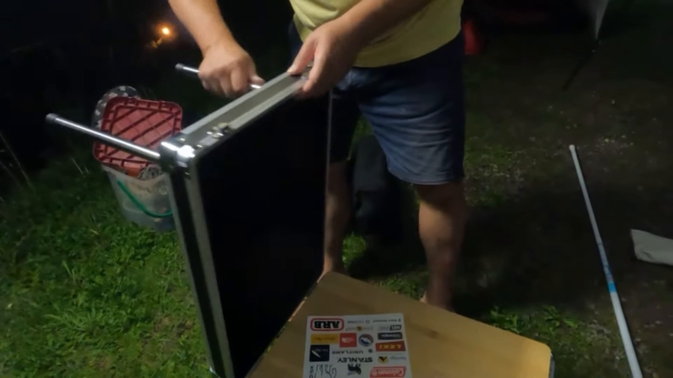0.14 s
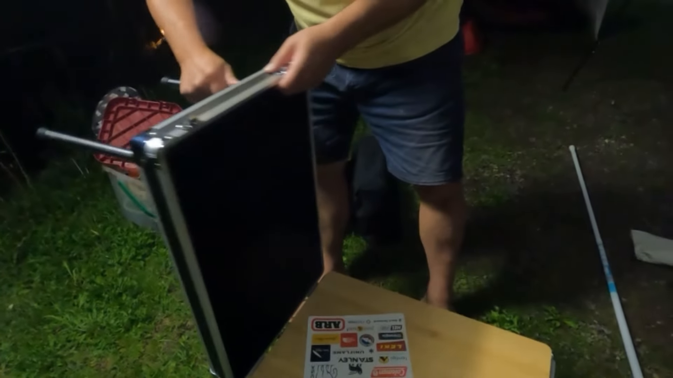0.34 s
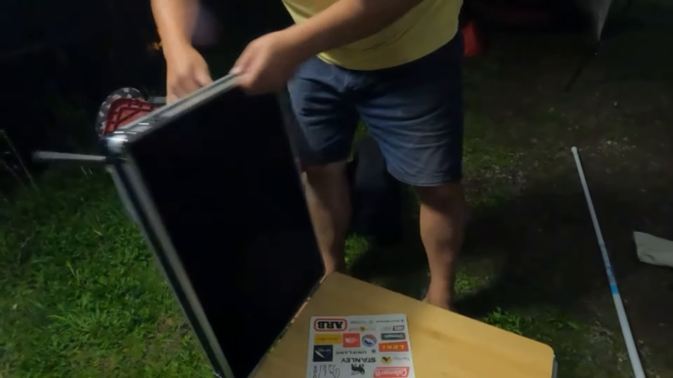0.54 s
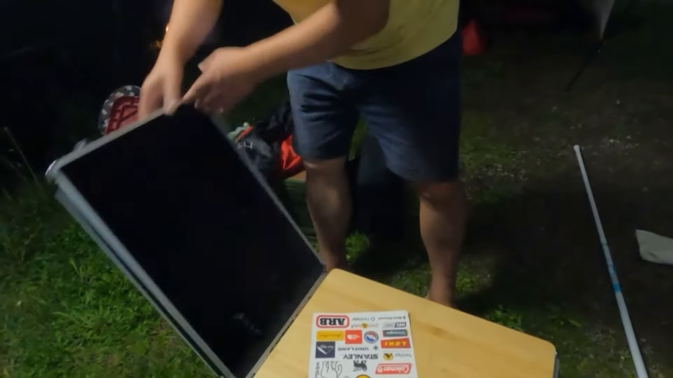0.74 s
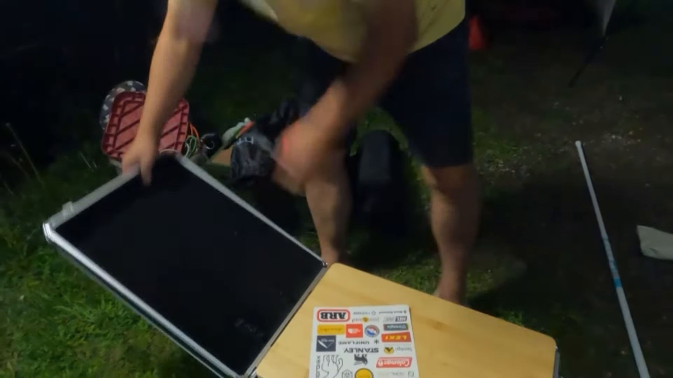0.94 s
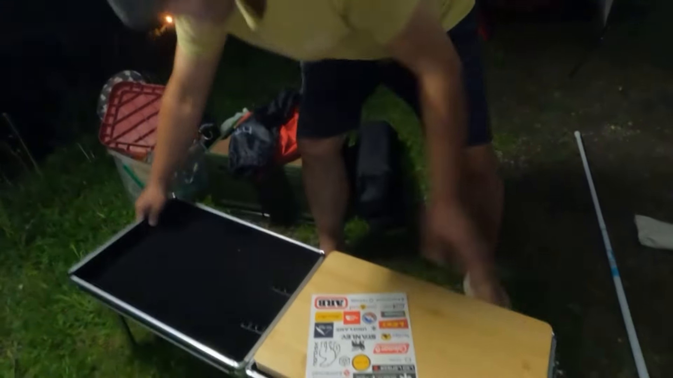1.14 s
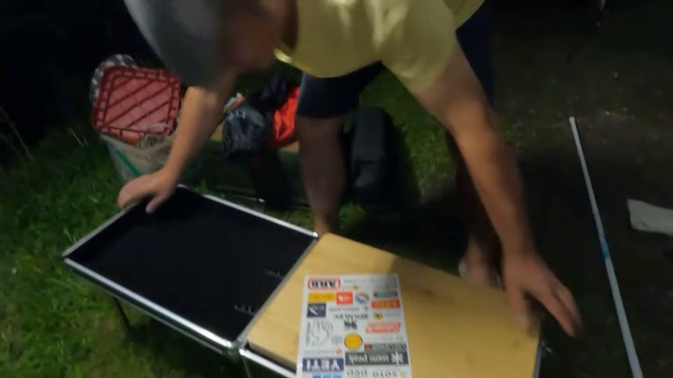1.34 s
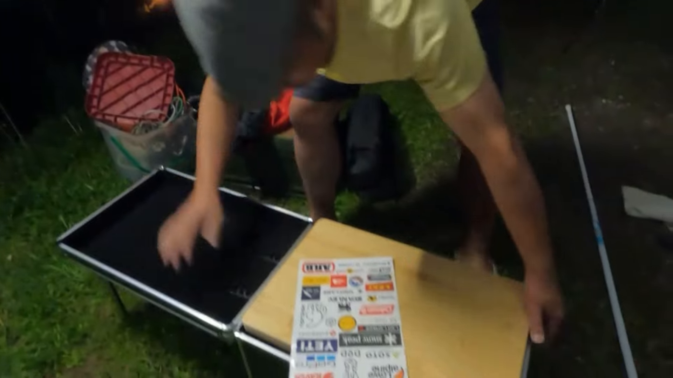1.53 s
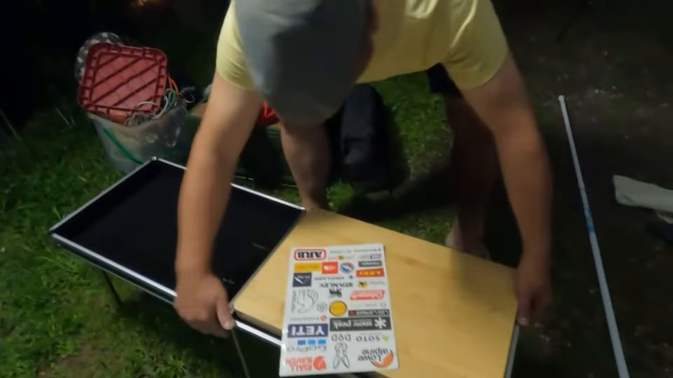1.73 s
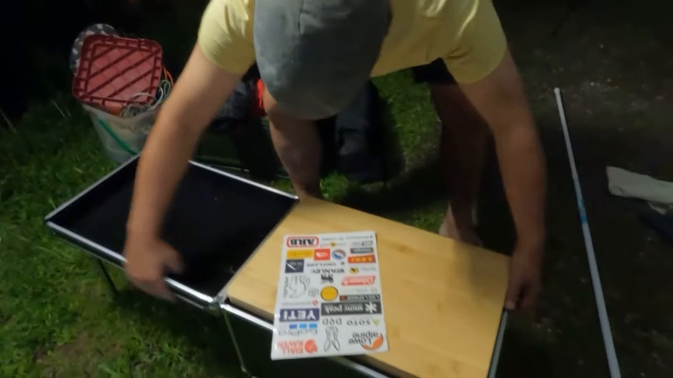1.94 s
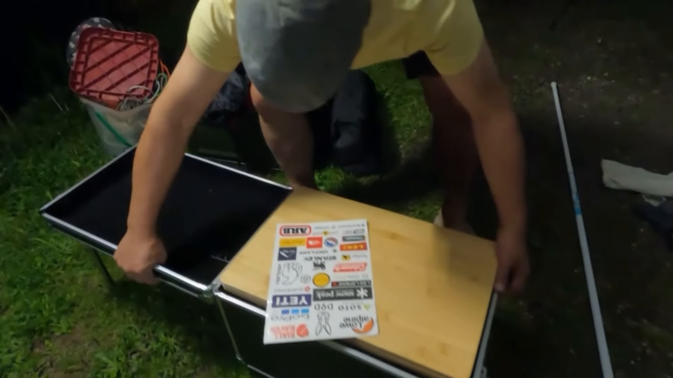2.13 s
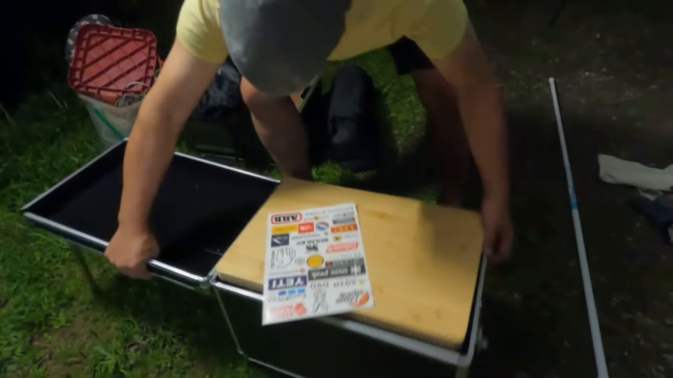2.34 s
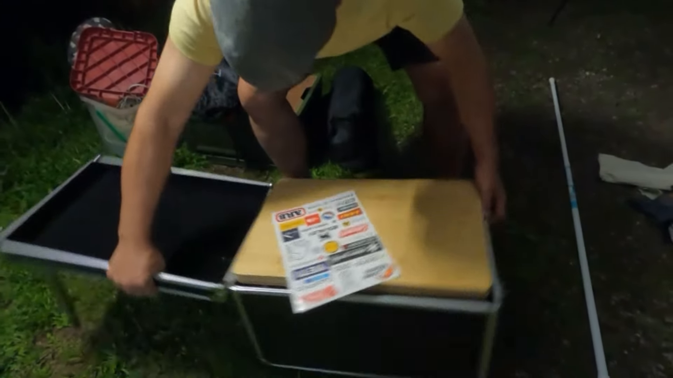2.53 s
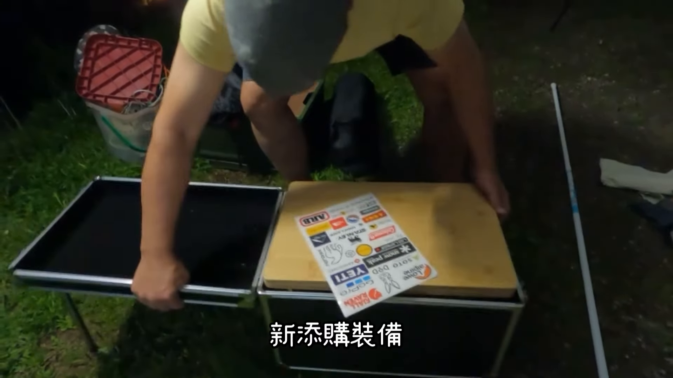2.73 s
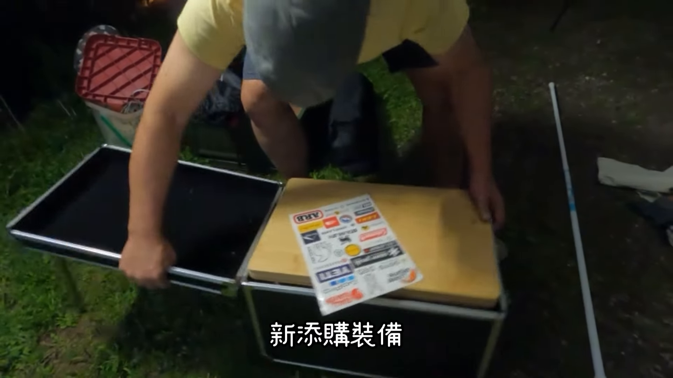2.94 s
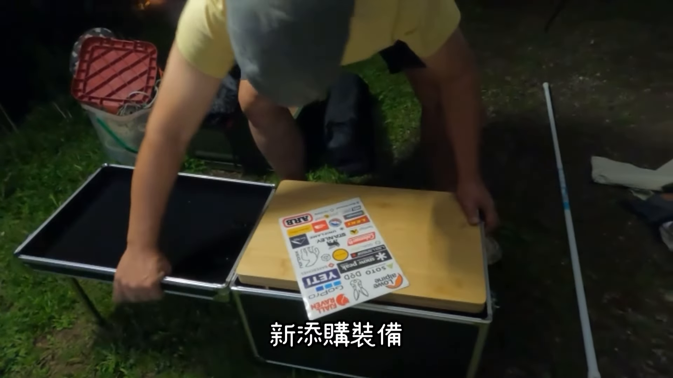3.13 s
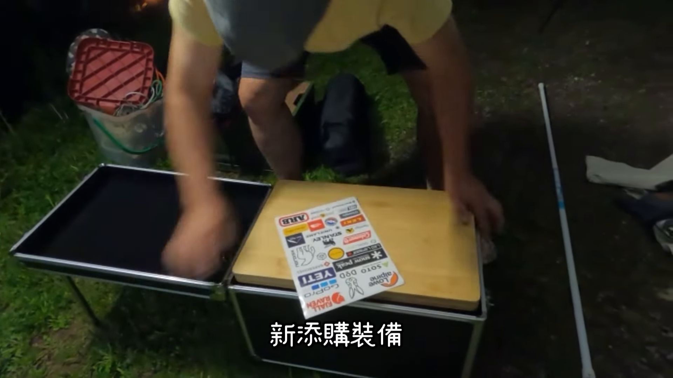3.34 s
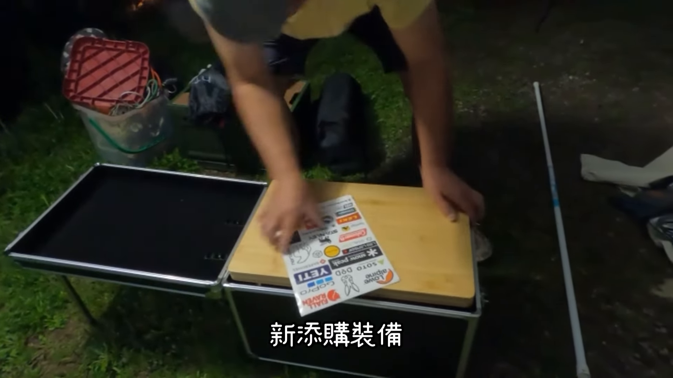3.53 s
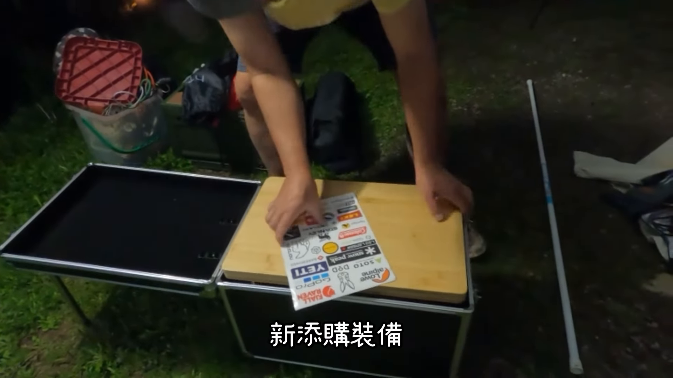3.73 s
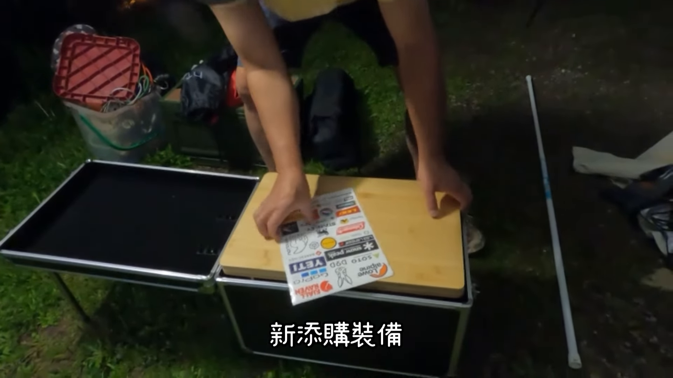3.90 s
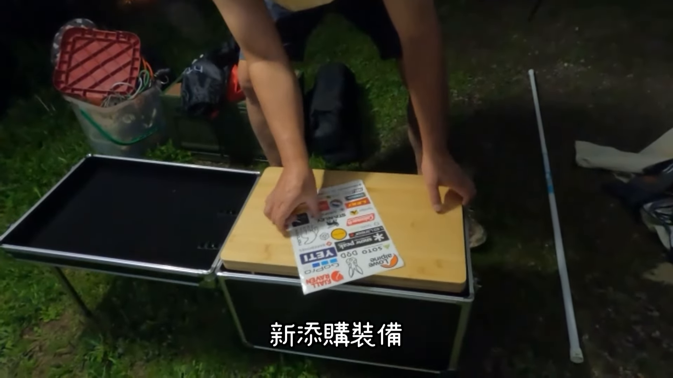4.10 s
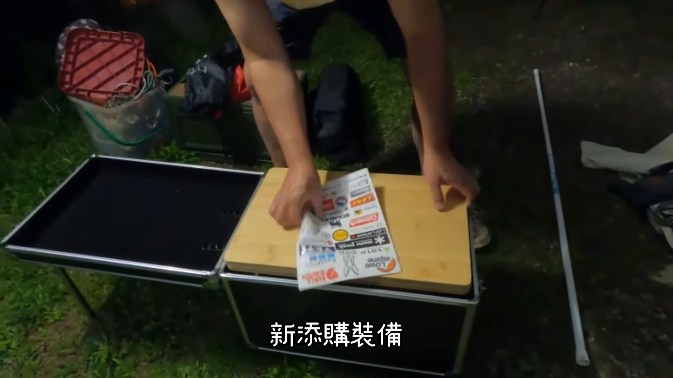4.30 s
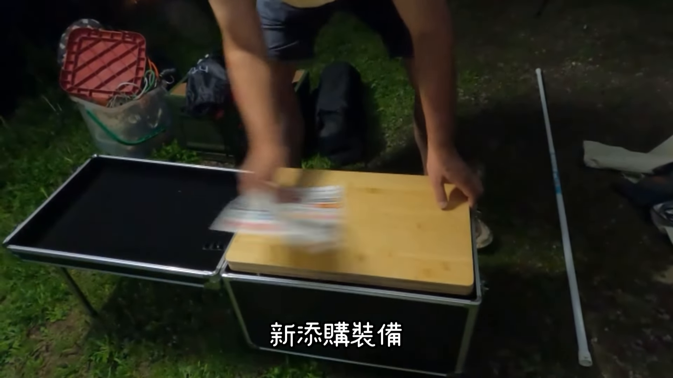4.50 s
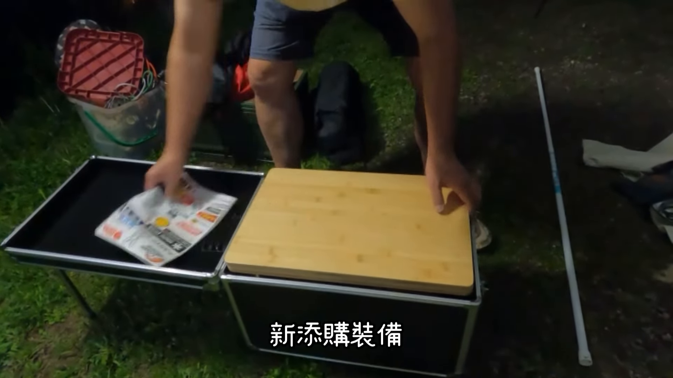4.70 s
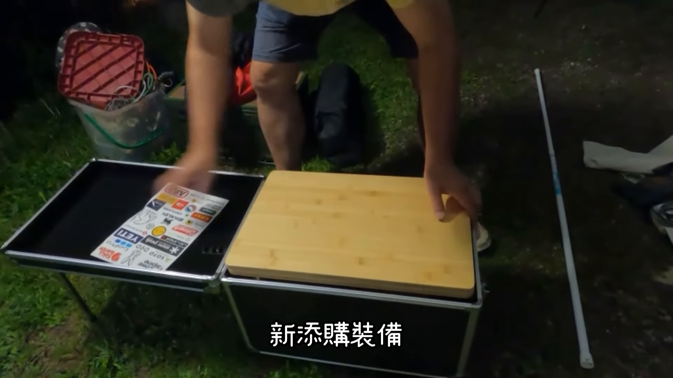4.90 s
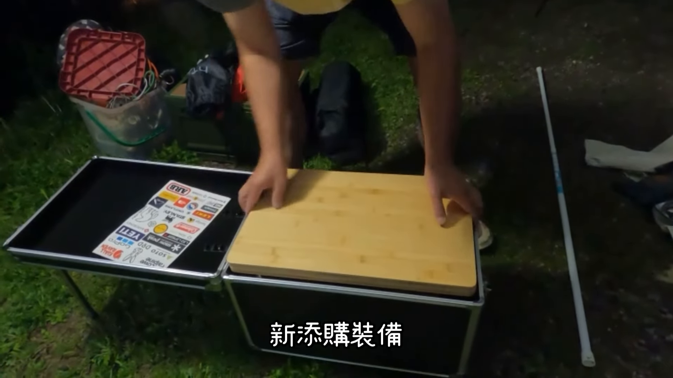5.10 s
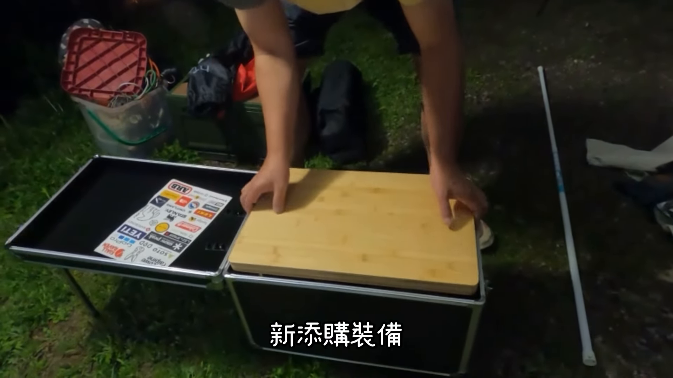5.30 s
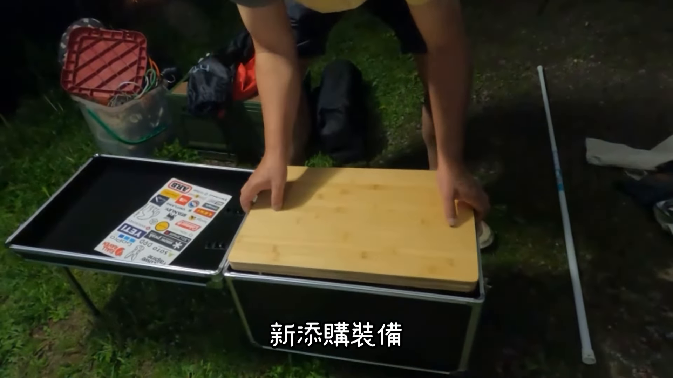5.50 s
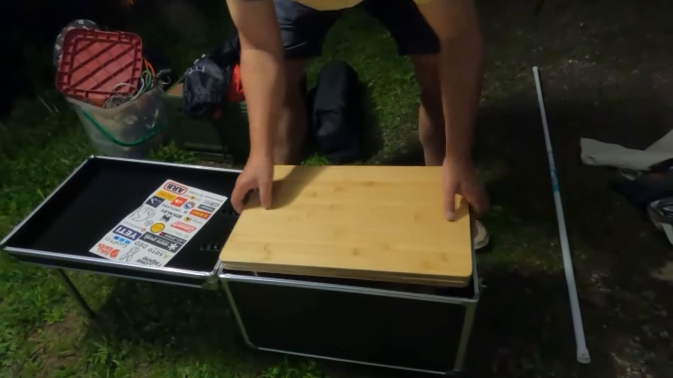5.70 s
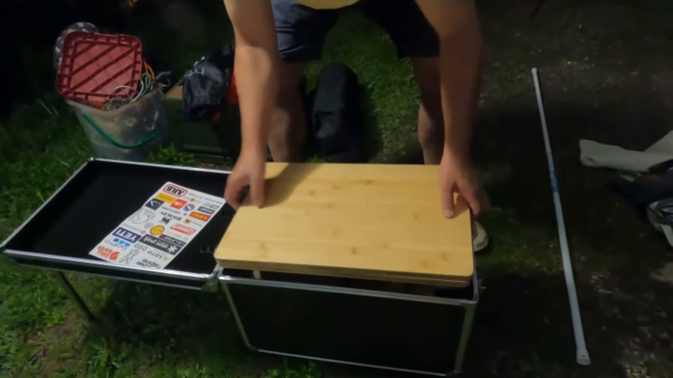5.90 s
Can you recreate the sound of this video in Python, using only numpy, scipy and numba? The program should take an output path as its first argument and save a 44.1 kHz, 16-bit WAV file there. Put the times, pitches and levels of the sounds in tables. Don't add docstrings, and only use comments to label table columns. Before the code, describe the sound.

At night outdoors, a folding metal-framed table clacks open with knocks and thuds, then a thin sheet swishes aside, over faint insects.

```python
import sys
import numpy as np
from scipy import signal
from scipy.fft import rfft, irfft, next_fast_len
from scipy.io import wavfile
from numba import njit

SR = 44100
rng = np.random.default_rng(int(sys.argv[2]) if len(sys.argv) > 2 else 0)


def unload_wav(signal):
    wavfile.write(
        sys.argv[1],
        SR,
        np.round(np.clip(np.atleast_2d(signal).T, -1, 1) * 32767).astype(np.int16),
    )


def attenuation_scalar(level_db):
    decades = np.asarray(level_db, float) / 20
    return 10 ** decades


N = 262395

# (time [s], peak level [dB], brightness [dB], tail T60 [s])
LEG_RINGS = [
    (0.679, -37.5, -4.5, 0.15),
    (0.822, -46, -11, 0.045),
    (2.694, -18, -25, 0.18),
    (2.858, -32.5, -22.5, 0.33),
    (3.085, -27.5, -31, 0.15),
    (3.112, -13.5, -10.5, 0.13),
]
JOINT_KNOCKS = [(1.235, -10.5, -15.5, .069), (1.242, -9.5, -9, .12), (1.25, -16, -24, 0.11),
                (1.93, -33.5, -26, 0.21), (2.338, -39, -13, 0.34), (2.469, -26, -24, 0.14),
                (2.598, -24, -20.5, 0.65), (2.682, -12.5, -8.5, 0.12), (2.728, -18, -16.5, 0.27),
                (2.965, -17, -19, .3), (2.999, -22, -9.5, 0.12), (3.117, -9.5, -20.5, 0.17),
                (3.126, -13, -16.5, 0.16), (3.197, -25.5, -10, 0.11), (1.592, -31, -15.5, .12),
                (5.104, -27.5, -13, 0.2), (5.569, -52, -13, 0.24), (5.893, -17, -13.5, .11)]
RIM_SNAPS = [(0.119, -36.5, -9.5, 0.088), (1.607, -32, -15, 0.15), (1.99, -31.5, -11.5, 0.35),
             (2.044, -33, -22, 0.22), (1.222, -27, -29, .25), (4.398, -32.5, -24.5, 0.14),
             (1.677, -31, -27, 0.19), (1.842, -17, -17, 0.094), (2.292, -42, -20, 0.13),
             (2.4, -43, -13, 0.28), (2.77, -16.5, -8, 0.085), (3.133, -13, -3.5, 0.063),
             (3.187, -14, -21.5, 0.081), (3.33, -31, -11, .27), (3.348, -27, -14, 0.54),
             (3.885, -43.5, -27.5, 0.22), (4.413, -16, -11.5, 0.067), (4.713, -25.5, -37, 0.061),
             (4.724, -22.5, -17, 0.029), (4.733, -14, -21, 0.1), (4.817, -28.5, -18.5, 0.29),
             (5.284, -32, -14.5, 0.18)]
TUBE_TAPS = [
    (1.088, -40.5, -43.5, 0.53),
    (1.748, -52, 6.5, 0.25),
    (2.246, -41, -32, .13),
    (2.529, -41, -12, 0.11),
    (4.306, -43, -15, 0.13),
    (4.798, -37.5, -3.5, 0.11),
    (4.898, -38, -14, 0.089),
    (5.707, -47.5, -13, .072),
]
TICKS = [
    (1.667, -45, -7, .098),
    (3.38, -28, -17, 0.15),
    (3.403, -28, -2.5, 0.08),
    (3.988, -44, 4, 0.2),
    (4.038, -45.5, -9, .075),
    (4.089, -34, -3.5, 0.15),
    (4.624, -37, -14.5, 0.13),
    (4.826, -39, 0.5, 0.11),
    (5.361, -57, 2, .079),
    (5.385, -23.5, -6, .14),
]
LATCH_CLICKS = [
    (1.618, -10, -17.5, 0.18),
    (1.627, -16.5, -16, 0.13),
    (1.643, -29, -22, 0.081),
    (2.076, -14, -18.5, 0.15),
]
FREE_RINGS = [
    (2.743, -20, -32, 0.13),
    (2.886, -21, -36, 0.17),
    (2.937, -28, -52, 0.39),
]
# (frequency [Hz], share [dB], overtone [dB])
LEG = (1040, 13, -33.5)
JOINT = (992, -2.5, -16)
RIM = (1240, -12, 0)
TUBE = (2200, 2.6, -13)
PIN = (3680, 22, -31)
LATCH = (1230, 0.72, -1.44)
FREE_LEG = (860, 37, -38)
# (frequency [Hz], level [dB], T60 [s])
FRAME_MODES = [(1265, 0, 0.11), (1647, -1, 0.093), (2030, -10, 0.16), (2902, -8, 0.13), (3079, -1, 0.09),
               (3558, -6, 0.14), (4823, -12, 0.11), (5992, -22, 0.21), (6681, -15, 0.17)]
# (frequency [Hz], level [dB per Hz])
CLACK_BODY = [(240, -8), (400, -5.5), (641, -7), (706, -2), (770, -7), (1050, -5), (1170, -5), (1780, -3),
              (5200, -12), (6760, -60.5), (11400, -120)]
CLACK_TOP = [(2820, -82), (4800, -8), (5070, -6.5), (6440, -5), (7730, -12.5), (8650, -20.5), (10600, -17),
             (12100, -20.5), (13800, -33.5), (15500, -53.5)]
# (time [s], peak level [dB], frequency [Hz], T60 [s])
CLEAR_RINGS = [(1.2215, -26, 1564, .05), (1.222, -28.5, 977, .12), (1.243, -18.5, 1023, 0.057),
               (1.243, -21.5, 2500, 0.037), (1.592, -38, 1160, .04), (1.608, -37, 3720, .05),
               (1.618, -17, 1269, 0.1), (1.619, -13, 3610, .05), (1.619, -21, 2944, 0.053),
               (1.627, -23.5, 3310, 0.062), (1.629, -25.5, 1500, 0.062), (1.644, -29.5, 2890, .06),
               (1.668, -39, 3500, .06), (1.678, -37, 1250, 0.096), (2.0765, -17, 1230, .11),
               (2.077, -23.5, 2846, 0.064), (2.077, -23, 3550, 0.051), (2.086, -27, 2004, 0.067),
               (2.09, -29.5, 2905, 0.056), (2.121, -42, 720, 0.075), (2.684, -20, 1043, 0.062),
               (2.7, -26, 1000, 0.065), (2.73, -22.5, 560, .05), (2.739, -22.5, 1105, 0.037),
               (2.753, -24.5, 1000, 0.083), (2.771, -26.5, 2210, 0.035), (2.859, -34.5, 960, .05),
               (2.8855, -15.5, 921, 0.036), (2.894, -24, 515, .04), (2.939, -32, 906, .07),
               (2.94, -35, 1540, .05), (2.966, -26.5, 907, 0.07), (3.059, -31.5, 900, .06),
               (3.087, -30, 946, .05), (3.111, -20.5, 2316, .04), (3.135, -20.5, 1490, 0.044),
               (3.147, -27.5, 1400, 0.046), (2.618, -32, 620, .12), (5.106, -32, 780, .1),
               (4.399, -27, 1500, .04), (4.414, -26.5, 4880, 0.035), (4.416, -24, 1213, .25),
               (4.624, -33, 4500, .03), (4.713, -34.5, 1700, 0.046), (4.733, -18.5, 2800, 0.029),
               (4.733, -21.5, 1410, 0.067), (4.75, -33.5, 776, 0.097), (2.64, -30, 520, .12),
               (4.818, -38, 1500, 0.036)]

# (time [s], peak level [dB], lowest panel mode [Hz], T60 [s])
PANEL_KNOCKS = [(2.137, -45.5, 210, .14), (1.622, -28.5, 286, 0.19), (1.758, -44.5, 143, 0.23),
                (1.841, -43, 192, 0.2), (2.402, -42, 98, 0.13), (2.73, -16.5, 154, 0.23),
                (2.774, -30, 119, 0.065), (2.853, -32, 102, 0.089), (2.889, -21, 168, 0.077),
                (2.998, -21.5, 177.7, 0.2), (3.11, -8, 249.3, 0.055), (4.729, -39.5, 233.5, 0.22),
                (4.817, -33.5, 191, 0.092), (5.102, -22, 157.4, .22), (5.386, -35, 157.2, .21),
                (5.567, -47, 180.3, 0.23), (5.892, -24, 321, 0.054), (5.919, -25.5, 188, 0.04)]
JOLTS = [(0.326, -49, 134.8, 0.45), (0.497, -76, 210, 0.099), (0.68, -24.5, 175, .16),
         (1.083, -44.5, 235, 0.061), (1.236, -15.5, 201.6, 0.068), (1.249, -15.5, 112, 0.17),
         (2.675, -18.5, 135, .18), (2.746, -15.5, 140.4, 0.056), (2.963, -27.5, 116.5, 0.43),
         (3.058, -35, 282, .09), (3.124, -12, 139, 0.046), (3.142, -23, 155.5, 0.092),
         (3.187, -35, 126.7, 0.23), (3.555, -39, 134, .24), (3.688, -49, 167, 0.11),
         (4.519, -62.5, 158, 0.057), (4.621, -63, 170, .13), (5.284, -39.5, 172, 0.37),
         (5.328, -42, 290, .073), (5.785, -48, 206, .17)]
ROCKING = [
    (0.11, -55.5, 281, 0.24),
    (0.447, -58.5, 110, 0.074),
]
# (multiple of lowest mode [1], level [dB])
PANEL_OVERTONES = [(1.9, -4), (3.1, -4), (4.7, -5.5)]
# (frequency [Hz], level [dB per Hz])
PUFF = [(60, -18.5), (120, 4.5), (330, -0.5), (600, -19.5), (1000, -24)]
# (time [s], peak level [dB], frequency [Hz], T60 [s])
SWAYS = [(0.09, -47, 79.2, 0.58), (0.33, -47, 75, 0.54), (0.8, -47, 80, .4), (1.08, -48, 60, .3),
         (1.228, -22, 170, 0.092), (1.26, -24, 150, .12), (1.27, -36, 45, .25), (1.64, -40, 159, .2),
         (1.76, -46, 72.4, 0.23), (2.08, -43.5, 200, .1), (2.09, -44.5, 140, .25), (2.33, -48, 260, .15),
         (2.405, -40.5, 266, 0.13), (2.777, -16, 129, 0.023), (2.791, -23, 112, 0.14),
         (2.8515, -22, 100, .05), (3.41, -47.5, 75, 0.26), (0.93, -50, 48, .4), (5.108, -27, 298, 0.088),
         (5.29, -44, 84.7, .4), (5.41, -48, 70, .4)]

# (stop time [s], final level [dB], length [s], air gap resonance at start [Hz], at stop [Hz])
SLIDES = [(1.228, -49, 0.1, 1900, 1100), (2.712, -36.5, 0.14, 800, 970), (3.622, -53, 0.18, 2100, 3000),
          (3.656, -45.5, 0.075, 2740, 3500), (1.831, -45.5, 0.05, 930, 1000), (3.1, -54, 0.12, 1100, 1070),
          (3.862, -55, 0.078, 1300, 1380), (4.324, -41, 0.05, 3300, 1900), (4.418, -44, 0.06, 1600, 1200),
          (4.401, -35, .005, 1300, 1300), (0.864, -56, 0.24, 1200, 760), (4.416, -33, 0.008, 1300, 1200),
          (3.999, -46.5, 0.013, 3500, 4600), (4.057, -49.5, 0.059, 3300, 4200),
          (4.534, -41.5, 0.12, 1700, 3000), (4.57, -42, 0.087, 1300, 2900), (4.65, -43, 0.091, 3900, 3500),
          (4.674, -42, 0.027, 2740, 1270), (1.3, -51, 0.125, 1700, 1700), (0.95, -58, 0.067, 1200, 1400),
          (1.2, -63, .06, 1200, 1300), (4.87, -53, .05, 2500, 2500), (5.365, -56, .008, 4500, 4500),
          (5.58, -60.5, .03, 1000, 1300), (5.885, -56, 0.044, 1500, 1500), (0.54, -62, .01, 6500, 6500),
          (0.65, -63, .04, 5000, 6100), (2.66, -44, .05, 600, 900), (3.09, -40.5, 0.014, 2500, 2500),
          (4.37, -47, .05, 1800, 1600)]
# (time [s], frequency [Hz], level [dB])
SQUEAL = [
    (4.26, 2360, -72),
    (4.30, 2100, -46.5),
    (4.33, 1950, -45.5),
    (4.38, 1606, -52),
    (4.415, 1210, -29.5),
    (4.44, 1210, -36.5),
    (4.45, 1254, -87),
]

# (time [s], hand motion level [dB], load on the frame [dB], stiffness of what is rubbed [dB])
HANDLING = [(0.0, -66.5, -65, -3), (0.62, -70, -56.5, -1), (0.83, -57.5, -54, -5), (1.21, -58.5, -61.5, -5),
            (1.55, -66.5, -64, -1.5), (1.77, -56, -52, -4), (1.9, -61, -74, -0.5), (2.33, -59, -60, -2.5),
            (2.68, -52.5, -47, -5), (3.05, -51.5, -31.5, -5.5), (3.26, -58.5, -55, -5),
            (3.78, -67, -58.5, -4.5), (4.06, -61, -64.5, 1.5), (4.48, -51, -62, -7.5), (4.6, -67, -62, 10),
            (4.77, -53, -51, -5), (5.1, -81, -65, -16), (5.95, -64.5, -56.5, -6.5)]
# (frequency [Hz], level [dB per Hz])
RUSTLE = [(530, -22), (900, -0.5), (1350, 3.5), (2090, -0.5), (2450, -6), (3000, -1), (5200, -6),
          (6760, -14), (11400, -120)]
RUSTLE_TOP = [(2820, -13), (4800, -5.5), (5190, -0.5), (6540, -4.5), (7040, -4), (7500, -5.5), (8190, -14),
              (10700, -8), (13300, -20), (15500, -31)]
RUSTLE_LOW = [(300, -6), (380, 6.5), (950, -4), (1100, 1.5)]
RUMBLE = [(13, -47.5), (22, -21), (43, -6), (63, -5.5), (81, 2.5), (94, -8.5), (124, -15.5), (161, -9),
          (228, -7), (333, -16), (380, -34), (490, -45.5), (840, -120)]

# (time [s], level [dB])
SOLOIST = [
    (5.3, -89.5),
    (5.5, -67.5),
    (5.7, -65),
    (5.95, -68),
]
# (time [s], level [dB])
CHORUS = [
    (0.0, -60.5),
    (5.95, -60),
]
# (frequency [Hz], width [Hz], level [dB])
CHORUS_BANDS = [
    (3634, 300, 15.5),
    (4140, 890, 5),
    (4630, 1300, -25.5),
]
# (frequency [Hz], level [dB per Hz])
NIGHT = [(15, -38.5), (25, 1), (59, 1), (178, 10.5), (552, -30), (1340, -5), (3000, -42), (3930, 12),
         (4500, -2.5), (8350, -25), (10600, -39.5), (13600, -51), (15500, -67)]

OVERTONE = 2.78
RING_RISE_S, SWAY_RISE_S = 0.00041, 0.0065
RING_HOLD, RING_SPREAD, RING_DB = .62, .06, -2
BOOM_HZ, BOOM_T60_S = 84.8, 0.24
KNOCK_BOOM_DB, JOLT_BOOM_DB, ROCK_BOOM_DB = -23, -8, 17
SLIDE_BRIGHT_DB, SLIDE_DB_PER_OCTAVE, OPEN_GAP_HZ = -1, 14, 2330
BRIGHT_DB, BRIGHT_FOLLOWS = -62, 0.47
DRAG_DB, DRAG_MOTION, DRAG_LOAD = -71, 0.2, 0.94
SOLOIST_HZ, SOLOIST_WIDTH_HZ = 4800, 500
CHORUS_EDGE_HZ = 3200
NIGHT_DB = -56.5
DIFFUSE_DB, DIFFUSE_HZ = -5.5, 490
PORT_LAG_S, LEFT_TREBLE_DB, TREBLE_HZ = 1.4e-5, 3.5, 6950
SCATTER_S, SCATTER_DB, SCATTER_HZ = .003, -15.5, 900
PORT_LIMIT_HZ = 15700


def rms_one(x):
    return x / np.sqrt(np.mean(x ** 2) + 1e-20)


def peak_one(x):
    return x / np.abs(x).max()


def in_time(rows):
    s, *columns = np.transpose(rows)
    return [np.interp(np.arange(N) / SR, s, column) for column in columns]


def by_time(*kinds):
    return sorted((*row, *shared) for rows, shared in kinds for row in rows)


def add(out, sound, s):
    at = round(s * SR)
    out[..., at:at + sound.shape[-1]] += sound[..., :N - at]


def drift(rate):
    r = np.exp(-80 * np.pi * rate / SR)
    steps = rng.standard_normal(N // 40 + 2002)
    slow = signal.lfilter([1], [1, -2 * r, r * r], steps)[2000:]
    return np.interp(np.arange(N) / 40, np.arange(len(slow)), rms_one(slow))


def noise(spectrum, grain_db=0):
    grains = attenuation_scalar(grain_db * np.minimum(rng.exponential(1, N), 6))
    white = rng.standard_normal(N) * grains
    hz = np.fft.rfftfreq(N, 1 / SR) + 1
    corners_hz, levels_db = np.transpose(spectrum)
    gain = attenuation_scalar(np.interp(np.log(hz), np.log(corners_hz), levels_db, -80, -80))
    return rms_one(irfft(rfft(white) * gain, N))


def resonance(x, hz, width_hz):
    r = np.exp(-np.pi * width_hz / SR)
    zeros = np.array([1, 0, -1]) * (1 - r * r) / 2
    poles = [1, -2 * r * np.cos(2 * np.pi * hz / SR), r * r]
    return signal.lfilter(zeros, poles, x)


def dying(t, t60):
    return attenuation_scalar(-60 * t / np.maximum(t60, .005))


def sine(hz, t):
    return np.sin(2 * np.pi * hz * t)


def clacks(crack_t60=0.014, tail_db=-14, modes_db=-26):
    out, t = np.zeros(N), np.arange(SR // 3) / SR
    body, top = noise(CLACK_BODY, 0.57), noise(CLACK_TOP, 2.37)
    rattle = attenuation_scalar(2.5 * drift(120))
    hits = by_time((LEG_RINGS, LEG), (JOINT_KNOCKS, JOINT), (RIM_SNAPS, RIM), (TUBE_TAPS, TUBE), (TICKS, PIN),
                   (LATCH_CLICKS, LATCH), (FREE_RINGS, FREE_LEG))
    mode_hz, mode_db, mode_t60s = np.transpose(FRAME_MODES)
    for s, peak_db, bright_db, t60, part_hz, share_db, over_db in hits:
        start = rng.integers(N - len(t))
        span = slice(start, start + len(t))
        softness = attenuation_scalar(-.45 * (peak_db + 11))
        rise = np.minimum(t / (0.00078 * softness), 1)
        crack = rise * dying(t, crack_t60 * np.sqrt(softness))
        tail = attenuation_scalar(tail_db) * rise * rattle[span]

        burst = peak_one(body[span] * crack) + body[span] * tail * dying(t, t60)
        part = resonance(burst, part_hz, 0.16 * part_hz)
        part = part + attenuation_scalar(over_db) * resonance(burst, OVERTONE * part_hz, 0.6 * part_hz)
        strength_db = rng.normal(0, 6.5, len(mode_hz))
        swings = sine(mode_hz[:, None], t) * dying(t, np.minimum(mode_t60s, t60)[:, None])
        modes = attenuation_scalar(mode_db + strength_db) @ swings
        low = burst + attenuation_scalar(share_db + 8) * part + attenuation_scalar(modes_db) * rise * modes

        high = peak_one(top[span] * crack) + attenuation_scalar(5.5) * top[span] * tail * dying(t, 0.93 * t60)
        add(out, attenuation_scalar(peak_db) * (peak_one(low) + attenuation_scalar(bright_db + 5) * peak_one(high)), s)
    return out


def rings(rows, rise_s, hold=1, spread=0, gain_db=0):
    out = np.zeros(N)
    for s, peak_db, hz, t60 in rows:
        t = np.arange(round(t60 * SR) + 100) / SR
        below, above = rng.uniform(.5, 1.5, 2) * [-1, 1]
        ratios = np.array([1, 1 + spread * below, 1 + spread * above])
        modes = [1, .7, .7] @ sine(hz * ratios[:, None], t)
        swing = modes * dying(t, hold * t60) * (1 - np.exp(-t / rise_s))
        add(out, attenuation_scalar(peak_db + gain_db) * peak_one(swing), s)
    return out


def thuds(contact_s=0.0028, puff_db=-12):
    out, puffs, t = np.zeros(N), np.zeros(N), np.arange(SR // 2) / SR
    blows = by_time((PANEL_KNOCKS, [KNOCK_BOOM_DB]), (JOLTS, [JOLT_BOOM_DB]), (ROCKING, [ROCK_BOOM_DB]))
    rise = 1 - np.exp(-t / contact_s)
    boom = sine(BOOM_HZ, t) * dying(t, BOOM_T60_S) * (1 - np.exp(-t / 0.0059))
    for s, peak_db, hz, t60, boom_db in blows:
        panel = sine(hz, t) * dying(t, t60)
        for multiple, level_db in PANEL_OVERTONES:
            strength, detune = rng.standard_normal(2)
            pitch = hz * multiple * (1 + 0.1084 * detune)
            overtone_db = level_db + 2.8 * strength - 6 * pitch / 400
            panel = panel + attenuation_scalar(overtone_db) * sine(pitch, t) * dying(t, 0.91 * t60 / multiple ** 0.43)
        add(out, attenuation_scalar(peak_db) * (peak_one(panel * rise) + attenuation_scalar(boom_db + 1.5) * boom), s)
        add(puffs, attenuation_scalar(peak_db + puff_db) * rise * dying(t, 1.15 * t60), s)
    uneven_damping = attenuation_scalar(drift(40))
    return out * uneven_damping + puffs * noise(PUFF)


@njit
def gap_filter(x, hz, damping):
    out, low = np.zeros((2, len(x))), 0.
    for i in range(1, len(x)):
        step = 2 * np.sin(np.pi * hz[i] / SR)
        low += step * out[1, i - 1]
        out[0, i] = x[i] - low - damping * out[1, i - 1]
        out[1, i] = out[1, i - 1] + step * out[0, i]
    return out


def slides(stop_s=0.0091, damping=0.47):
    out, body, top = np.zeros(N), noise(RUSTLE, 2.9), noise(RUSTLE_TOP, 1.0)
    catching = attenuation_scalar(2 * drift(60))
    for stop, final_db, length, from_hz, to_hz in SLIDES:
        octaves_closed = min(np.log2(max(from_hz, to_hz) / OPEN_GAP_HZ), 0)
        bright_db = SLIDE_BRIGHT_DB + SLIDE_DB_PER_OCTAVE * octaves_closed
        t = np.arange(round((length + .05) * SR)) / SR
        at = round((stop - length) * SR)
        span = slice(at, at + len(t))
        gap_hz = np.interp(t, [0, length], [from_hz, to_hz])
        gap = gap_filter(body[span], gap_hz, damping)[0]
        speed = np.sin(np.pi / 2 * np.minimum(t / length, 1))
        speed = speed * np.exp(-np.maximum(t - length, 0) / stop_s)
        add(out, attenuation_scalar(final_db) * speed * (rms_one(gap) + attenuation_scalar(bright_db) * speed * top[span]), stop - length)
    return out * catching


def squeal(damping=.06):
    hz, level_db = in_time(SQUEAL)
    narrow = gap_filter(rng.standard_normal(N), hz, damping)[1]
    return attenuation_scalar(level_db) * rms_one(narrow / np.sqrt(hz))


def handling():
    rustle_db, rumble_db, stiff_db = in_time(HANDLING)
    bright_db = BRIGHT_DB + stiff_db + BRIGHT_FOLLOWS * (rustle_db + 58.5)
    drag_db = DRAG_DB + DRAG_MOTION * (rustle_db + 59) + DRAG_LOAD * (rumble_db + 60)
    flutter_db = 2 * drift(20)
    grains = noise(RUSTLE, 2.6)
    cloth = rms_one(grains + attenuation_scalar(3) * resonance(grains, 1400, 1100))
    rustle = attenuation_scalar(rustle_db + flutter_db) * cloth
    bright = attenuation_scalar(bright_db + flutter_db) * noise(RUSTLE_TOP, 3.2)
    drag = attenuation_scalar(drag_db + flutter_db) * noise(RUSTLE_LOW, 0.99)
    rumble = attenuation_scalar(rumble_db + 2.4 * drift(5)) * noise(RUMBLE)
    return rustle + bright + drag + rumble


def soloist():
    [level_db] = in_time(SOLOIST)
    wing = resonance(rng.standard_normal(N), SOLOIST_HZ, SOLOIST_WIDTH_HZ)
    wing = resonance(wing, SOLOIST_HZ, SOLOIST_WIDTH_HZ)
    return attenuation_scalar(level_db + 2 * drift(30)) * rms_one(wing)


def insects():
    [level_db] = in_time(CHORUS)
    out = 0
    for hz, width_hz, band_db in CHORUS_BANDS:
        white = rng.standard_normal(N) + .35 * rng.standard_normal((2, N))
        wings = resonance(resonance(white, hz, width_hz), hz, width_hz)
        throb_db = 1.5 * drift(40) + drift(3)
        out = out + attenuation_scalar(band_db + throb_db) * rms_one(wings)
    edge = signal.butter(4, CHORUS_EDGE_HZ, "high", fs=SR, output="sos")
    return attenuation_scalar(level_db) * rms_one(signal.sosfilt(edge, out))


def night_air():
    return attenuation_scalar(NIGHT_DB) * noise(NIGHT)


def scene():
    table = clacks() + rings(CLEAR_RINGS, RING_RISE_S, RING_HOLD, RING_SPREAD, RING_DB)
    table = table + thuds() + rings(SWAYS, SWAY_RISE_S)
    near = table + slides() + squeal() + handling() + soloist() + insects() + attenuation_scalar(-2.5) * night_air()
    around = handling() + night_air()
    around = signal.lfilter(*signal.butter(1, DIFFUSE_HZ, "high", fs=SR), around)
    return near + attenuation_scalar(DIFFUSE_DB) * around * [[1], [-1]]


def band_limit(x):
    return signal.sosfilt(signal.butter(12, 15660, fs=SR, output="sos"), x)


def record(dry):
    size = next_fast_len(N + SR // 10)
    hz, t = np.fft.rfftfreq(size, 1 / SR), np.arange(SR // 20) / SR
    scatter = rng.standard_normal((2, len(t))) * np.exp(-t / SCATTER_S)
    scatter = rfft(scatter / np.sqrt(np.sum(scatter ** 2, axis=1, keepdims=True)), size)
    scatter = attenuation_scalar(SCATTER_DB) * scatter * 1j * hz / (SCATTER_HZ + 1j * hz)
    moving = np.clip([drift(8), drift(8)], -1.5, 1.5)
    side = np.sum(rfft(dry * moving, size) * scatter, axis=0) * [[1], [-1]]
    treble_db = LEFT_TREBLE_DB / (1 + (TREBLE_HZ / (hz + 1)) ** 4)
    tilt = attenuation_scalar(np.outer([.5, -.5], treble_db))
    lag = np.exp(-2j * np.pi * np.outer([PORT_LAG_S, 0], hz))
    spectrum = (rfft(dry, size) + side) * tilt * lag * (hz < PORT_LIMIT_HZ)
    return band_limit(irfft(spectrum, size)[:, :N])


dry = scene()
out = record(dry)
unload_wav(out)
```